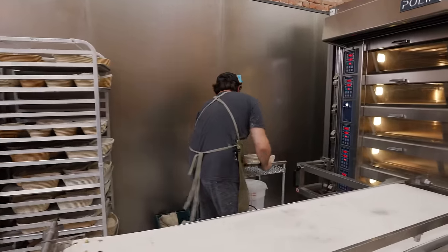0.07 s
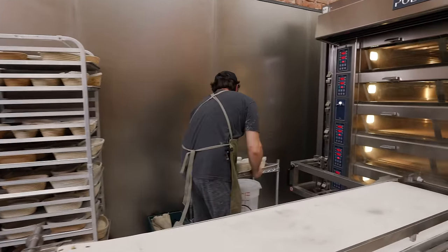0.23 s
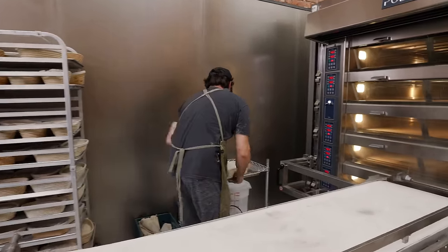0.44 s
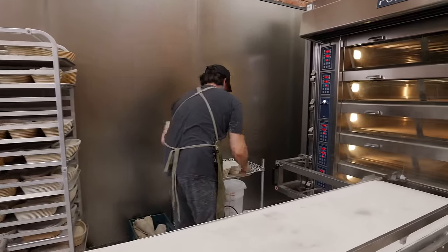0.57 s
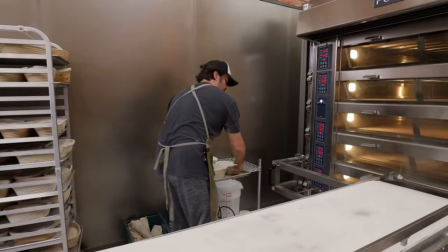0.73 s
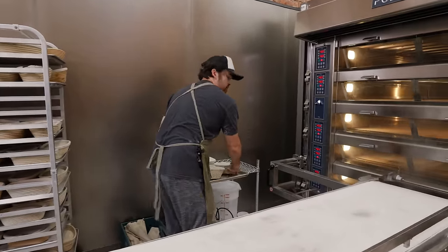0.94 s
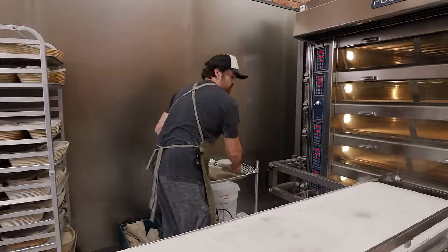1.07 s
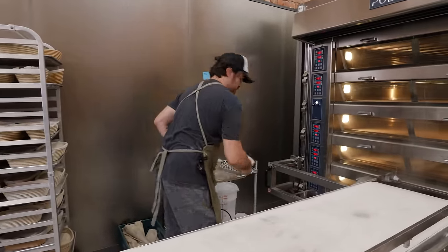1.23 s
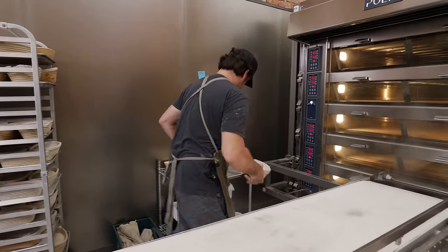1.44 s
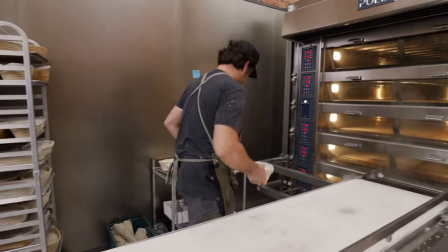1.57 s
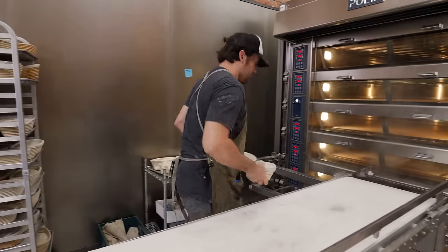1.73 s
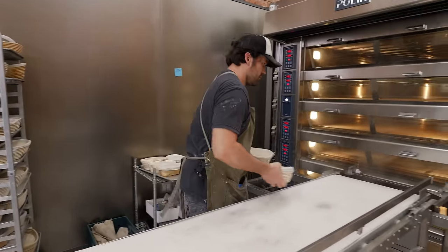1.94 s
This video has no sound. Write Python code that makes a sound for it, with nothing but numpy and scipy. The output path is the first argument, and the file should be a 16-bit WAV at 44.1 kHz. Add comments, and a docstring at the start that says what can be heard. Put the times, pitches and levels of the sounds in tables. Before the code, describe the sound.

Quick hollow knocks of bread baskets on a cart, then faint rustling and oven hum.

```python
"""In a steel-walled bakery, an oven hums and blows while a bread basket slides over a wire cart.
It knocks down among other baskets in five hollow clacks with small rebounds; each impact excites
damped modes of the basket, the wires and the shelf. Afterwards baskets and cloth rustle and tick
softly by friction as one is lifted away. The room reverberates briefly."""
import sys
import numpy as np
from scipy import signal
from scipy.fft import rfft, irfft
from scipy.io import wavfile

SR = 44100
rng = np.random.default_rng(int(sys.argv[2]) if len(sys.argv) > 2 else 0)


def file_out(sig):
    """Save sig as 16-bit WAV at sys.argv[1]."""
    # one column per channel
    cols = np.atleast_2d(sig).T
    # limit, then scale
    lim = np.clip(cols, -1, 1)
    pcm = np.round(lim * 32767).astype(np.int16)
    wavfile.write(sys.argv[1], SR, pcm)


N = 88200


def amp(db):
    """Amplitude ratio of a level in decibels."""
    return 10 ** (np.asarray(db) / 20)


def unit(x):
    """Normalisation to rms 1."""
    return x / np.sqrt(np.mean(x ** 2) + 1e-20)


def read(points, hz):
    """Interpolation of a table on a logarithmic frequency axis."""
    f, value = np.transpose(points)
    return np.interp(np.log(hz + 1), np.log(f + 1), value)


def add(mix, start_s, sound):
    """Superposition of a sound on the mix."""
    part = mix[max(round(start_s * SR), 0):][:len(sound)]
    part += sound[:len(part)]


def colour(x, spectrum, tilt_db=0):
    """Spectral shaping to rms 1, with a tilt in dB per octave above 1500 Hz."""
    hz = np.fft.rfftfreq(len(x), 1 / SR)
    octaves = np.log2(np.maximum(hz, 1500) / 1500)
    return unit(irfft(rfft(x) * amp(read(spectrum, hz) + tilt_db * octaves), len(x)))


def hump(hz, centre_hz, octaves):
    """Band-pass gain, Gaussian in log frequency."""
    return np.exp(-.5 * (np.log2((hz + 1) / centre_hz) / octaves) ** 2)


def decay(t, t60):
    """Exponential damping by 60 dB in t60 seconds."""
    return np.exp(-np.log(1000) * t / np.maximum(t60, 1e-3))


def ring(modes, t, weights=1):
    """Free vibration: a sum of damped modes, neighbours in opposite phase, with initial power 1."""
    hz, db, t60 = np.transpose(modes)
    gain = amp(db) * weights * (-1) ** (np.arange(len(hz)) + 1)
    waves = np.sin(2 * np.pi * hz * t[:, None]) * decay(t[:, None], t60)
    return waves @ gain / np.sqrt(np.sum(gain ** 2) / 2)


# Reverberation time of the bakery. Each row: frequency in Hz, t60 in seconds.
ROOM_T60 = [(120, 0.15), (190, 0.55), (350, 0.63), (800, 0.75), (2200, 0.49), (6000, 0.36), (15000, 0.36)]


def room(x):
    """Reverberation: dense reflections off steel and tile, lasting longest in the midrange."""
    hz, t, spectra = signal.stft(rng.standard_normal(SR), SR, nperseg=256)
    tail = signal.istft(spectra * decay(t, read(ROOM_T60, hz)[:, None]), SR, nperseg=256)[1]
    delay_s, build_s = 0.0059, 0.004
    tail *= np.clip((np.arange(len(tail)) / SR - delay_s) / build_s, 0, 1)
    return amp(-8.5) * signal.fftconvolve(x, tail / np.linalg.norm(tail))


# Spectrum of the oven fan. Each row: frequency in Hz, relative spectral density in dB.
FAN_SPECTRUM = [(20, -28), (45, -10), (85, -38), (120, -1), (180, -1.5), (300, 1), (550, 1), (800, -3.5),
                (1300, -10), (2200, -13), (4000, -21.5), (7000, -30), (11000, -35), (16000, -35)]
# Partials of the oven's hum. Each row: frequency in Hz, level in dB.
HUM_PARTIALS = [(59, -69.5), (118, -63.5), (177, -61.5), (236, -57), (474, -63.5), (710, -63)]


def oven():
    """Broadband fan noise plus a hum whose partials waver by slow amplitude modulation."""
    t = np.arange(N) / SR
    out = amp(-48) * colour(rng.standard_normal(N), FAN_SPECTRUM)
    for hz, db in HUM_PARTIALS:
        waver = unit(sum(np.sin(2 * np.pi * (f * t + rng.random())) for f in np.geomspace(.5, 8, 10)))
        partial = np.sqrt(2) * np.sin(2 * np.pi * (hz * t + rng.random()))
        out += amp(db) * (1 + 0.14 * waver) * partial
    return out


def friction(catches_per_s=820, catch_share=0.28):
    """Stick-slip friction: tiny random catches carry a share of the power, smooth hiss the rest."""
    catches = rng.standard_normal(N) * (rng.random(N) < catches_per_s / SR)
    return np.sqrt(catch_share) * unit(catches) + np.sqrt(1 - catch_share) * rng.standard_normal(N)


# Rubs of baskets and cloth. Each row: peak time, swell and fade, all in seconds, then level in dB.
RUBS = [(.03, 0.15, 0.65, -49.5), (.56, 0.24, 0.11, -47.5), (0.899, 0.18, .1, -57),
        (1.035, 0.055, 0.059, -51.5), (1.26, .08, 0.036, -60.5), (1.37, 0.015, 0.036, -54.5),
        (1.429, 0.019, 0.0084, -52), (1.50, 0.0099, 0.026, -51.5), (1.55, 0.021, 0.053, -53.5),
        (1.68, 0.072, 0.13, -57.5), (1.995, 0.059, .05, -44)]
# Spectrum of the rustle. Each row: frequency in Hz, relative spectral density in dB.
RUSTLE_SPECTRUM = [(30, -31), (100, 0.5), (400, 2), (800, -6), (1500, -7), (2800, -3), (5500, -9),
                   (7000, -16.5), (10000, -18.5), (16000, -36)]


def rustle():
    """Friction noise of handled baskets and cloth; each rub swells and fades as a lopsided Gaussian."""
    t = np.arange(N) / SR
    envelope = sum(amp(db) * np.exp(-((t - peak) / np.where(t < peak, swell, fade)) ** 2)
                   for peak, swell, fade, db in RUBS)
    return envelope * colour(friction(), RUSTLE_SPECTRUM)


# Envelope of the slide on the wire shelf. Each row: time in seconds, level in dB.
SLIDE_LEVEL = [(0, -56.5), (.06, -52.5), (.10, -45), (.15, -43), (.20, -37), (.215, -35.5), (.25, -90)]
# Spectrum of the slide at full speed. Each row: frequency in Hz, relative spectral density in dB.
SLIDE_SPECTRUM = [(30, -35), (100, 14), (400, -3), (900, 4), (2000, 2.5), (4500, 11.5), (7000, 10.5),
                  (9500, 10.5), (13000, 7.5), (16000, -3)]


def slide():
    """Sliding friction grows louder and brighter as the basket speeds up over the wires."""
    level_db, rub = curve_db(SLIDE_LEVEL), friction()
    bright_share = amp(0.76 * (level_db - level_db.max()))
    bright = colour(rub, SLIDE_SPECTRUM)
    dull = colour(rub, SLIDE_SPECTRUM, tilt_db=-10)
    return amp(level_db) * (bright_share * bright + (1 - bright_share) * dull)


def curve_db(points):
    """Linear interpolation of a level envelope at every sample."""
    return np.interp(np.arange(N) / SR, *np.transpose(points))


# Modes of the cart shelf. Each row: frequency in Hz, relative level in dB, t60 in seconds.
SHELF_MODES = [(134, -8, 0.082), (168.4, -2.5, 0.115), (192, -6, 0.11)]


def shelf_thump(t, rise_s=0.0036):
    """Low, strongly damped modes of the struck shelf give a thump."""
    return ring(SHELF_MODES, t) * (1 - np.exp(-t / rise_s))


# Spectrum of the contact noise. Each row: frequency in Hz, relative spectral density in dB.
CONTACT_SPECTRUM = [(100, -2), (350, 7), (900, 4.5), (1300, 1), (1450, -4), (1750, 3), (2150, -6),
                    (2800, -2), (3700, -2.5), (4300, -8.5), (5300, -5.5), (7000, -13.5), (8200, -11),
                    (11000, -15), (14000, -22.5), (16000, -30)]
# Modes of the cart's wires. Each row: frequency in Hz, relative level in dB, t60 in seconds.
WIRE_MODES = [(1274, -5, 0.1), (1309, 1.5, 0.17), (1583, 2.5, 0.11), (1738, -4.5, 0.14), (1805, 3.5, 0.13),
              (1985, -7, 0.24), (2460, -3.5, 0.16), (2605, -10.5, 0.32), (2813, -9, 0.17),
              (3170, -19, 0.14), (3770, -4.5, 0.16)]


def contact(t, tilt_db, rise_s):
    """Broadband excitation at the contact: a short crack, a longer fine rattle and ringing wires."""
    crack = colour(rng.standard_normal(len(t)), CONTACT_SPECTRUM, tilt_db) * decay(t, t60=0.03)
    rattle = colour(rng.standard_normal(len(t)), CONTACT_SPECTRUM, tilt_db - 2.5) * decay(t, t60=0.19)
    sound = amp(11) * crack + amp(0.5) * rattle + amp(-6) * ring(WIRE_MODES, t)
    return sound * (1 - np.exp(-t / rise_s))


# Modes of the hollow basket. Each row: frequency in Hz, relative level in dB, base t60 in seconds.
BASKET_MODES = [(276.7, -2, 0.37), (341.2, -1.5, 0.33), (387.4, 5.5, 0.12), (486.5, 1.5, 0.15),
                (548, -6.5, 0.41), (588, 7, 0.098), (637, 5, 0.14), (730, -4.5, 0.41), (809, -1, 0.17),
                (876, 6, 0.08), (982, -16.5, 0.51), (1108, -14.5, 0.35)]


def basket(t, centre_hz, sustain, rise_s):
    """Modal resonance of the hollow basket: the point of impact favours the modes near one pitch."""
    mode_hz, db, t60 = np.transpose(BASKET_MODES)
    weights = amp(-8) + hump(mode_hz, centre_hz, octaves=0.89)
    modes = ring(np.column_stack([mode_hz, db, t60 * sustain]), t, weights)
    first_swing = np.sin(2 * np.pi * centre_hz * t) * decay(t, t60=0.017)
    # The weave's crowded, quickly damped modes merge into a band of noise.
    band = hump(np.fft.rfftfreq(len(t), 1 / SR), centre_hz, octaves=0.5)
    noise = unit(irfft(rfft(rng.standard_normal(len(t))) * band, len(t)))
    weave = noise * decay(t, t60=0.091 * sustain)
    return (amp(6.5) * first_swing + amp(-2.5) * modes + weave) * (1 - np.exp(-t / rise_s))


# Blows and rebounds. Each row: start in seconds, basket gain in dB, centre pitch in Hz, factor on
# the basket's t60, shelf gain in dB, contact gain in dB, contact tilt in dB per octave.
KNOCKS = [ (.095, -40, 540, .5, -74, -69, 2), (0.2069, -12.5, 585, 1.6, -24.5, -20.5, -2.5),
          (.246, -12, 618, 0.72, -26, -26, -7.5), (0.2949, -17, 463, 1.4, -33, -22, -0.5),
          (0.363, -20, 420, 1.5, -25, -24, -3), (.368, -19.5, 420, 0.72, -41, -33.5, 1),
          (.379, -17.5, 560, 1.4, -45, -26.5, -2), (.385, -14.5, 457, .9, -27, -43, 0),
          (.399, -26, 560, .7, -38, -28, -6.5), (0.425, -24, 580, .8, -56, -37.5, -0.5),
          (0.4736, -16, 535, 0.73, -56, -25.5, -0.5), (.492, -23, 630, .6, -51, -40.5, 1.5),
          (.605, -46, 324, 0.21, -45, -27, 0.5), (.609, -15.5, 320, .8, -25.5, -28, 1),
          (.620, -24.5, 420, 1.22, -26, -66, -2), (1.028, -36, 810, .6, -66, -57, -4.5),
          (1.346, -38.5, 618, 0.39, -57, -55.5, -0.5), (1.428, -64, 880, .5, -74, -57.5, 0),
          (1.531, -72, 580, 0.57, -73, -59.5, 1.5)]


def knocks():
    """Impact excitation: yields the start and sound of each blow on basket, shelf and wires."""
    t = np.arange(SR // 2) / SR
    # A small object radiates little below 116 Hz.
    radiation = signal.butter(4, 116, "highpass", fs=SR, output="sos")
    for start_s, basket_db, centre_hz, sustain, shelf_db, contact_db, tilt_db in KNOCKS:
        softness_s = 0.00063 * max(-tilt_db, 0)  # a duller blow takes longer to build
        sound = amp(basket_db) * basket(t, centre_hz, sustain, rise_s=0.00061 + softness_s)
        sound += amp(shelf_db) * shelf_thump(t)
        sound += amp(contact_db) * contact(t, tilt_db, rise_s=0.00028 + softness_s)
        yield start_s, signal.sosfilt(radiation, sound)


def scene():
    """Superposition of oven, rubbing and knocks; each knock excites its own room reflections."""
    out = oven()
    rubbing = slide() + rustle()
    add(out, 0, rubbing)
    add(out, 0, room(rubbing))
    for start_s, sound in knocks():
        add(out, start_s, sound)
        add(out, start_s, room(sound))
    return out[None]


def record(dry, cutoff_hz=15850):
    """Band limiting by a linear-phase low-pass filter."""
    lowpass = signal.firwin(511, cutoff_hz, window=("kaiser", 9), fs=SR)
    return signal.oaconvolve(dry, lowpass[None], "same")


dry = scene()
out = record(dry)
file_out(out)
```